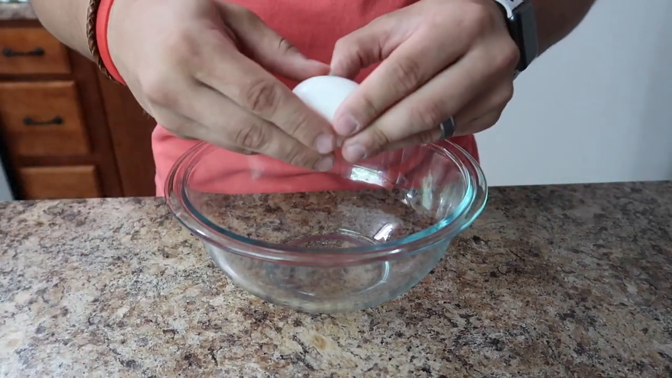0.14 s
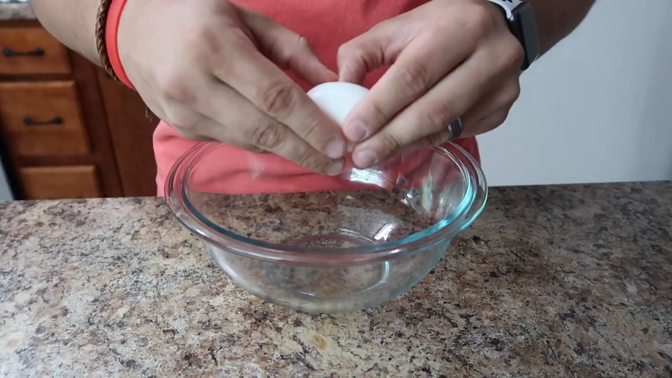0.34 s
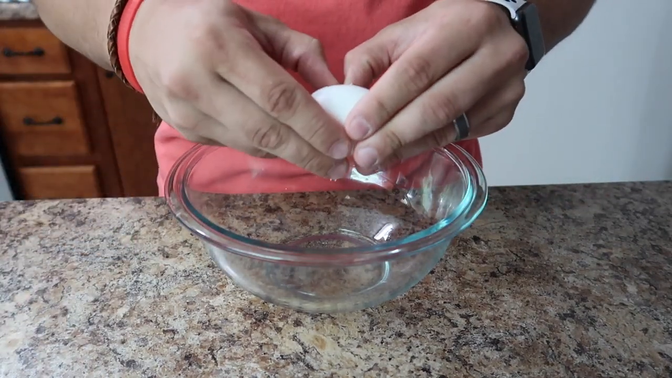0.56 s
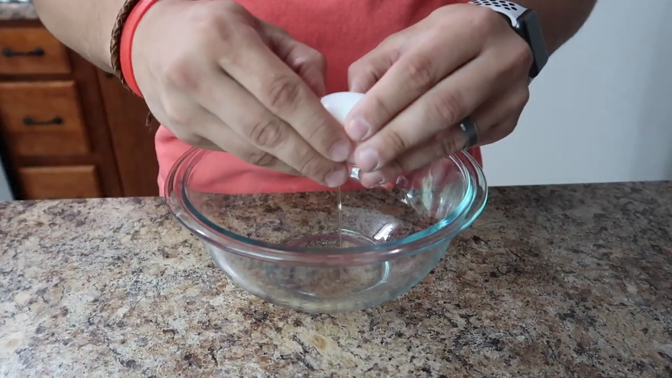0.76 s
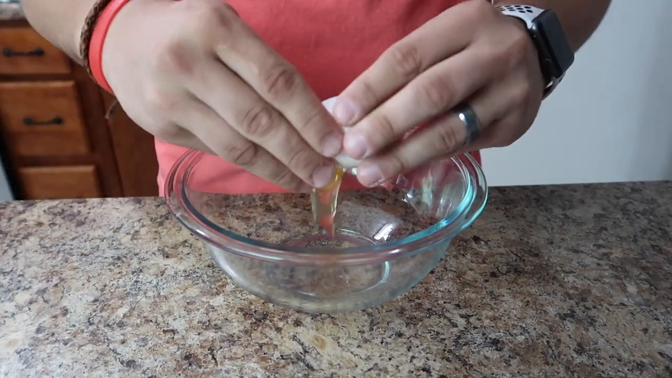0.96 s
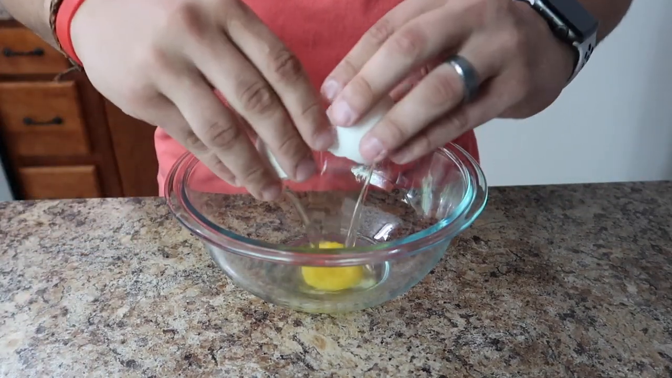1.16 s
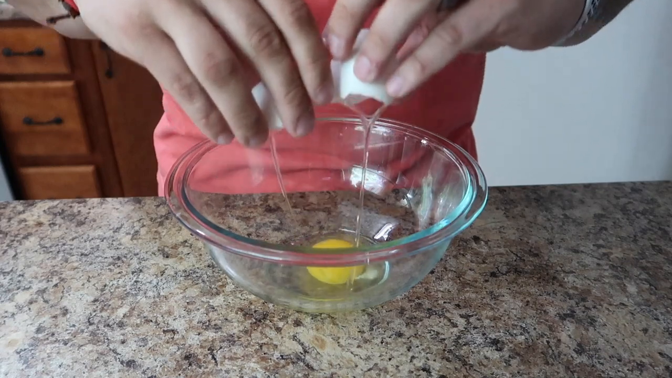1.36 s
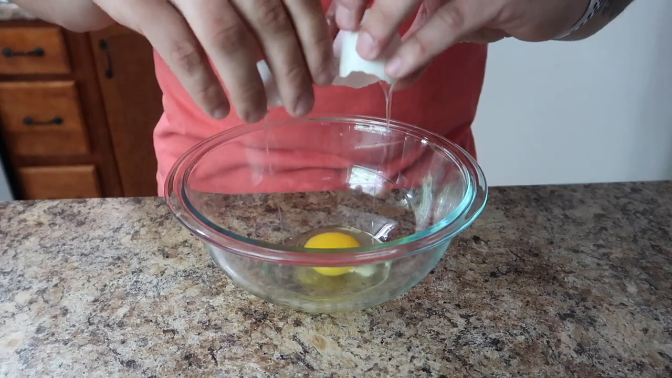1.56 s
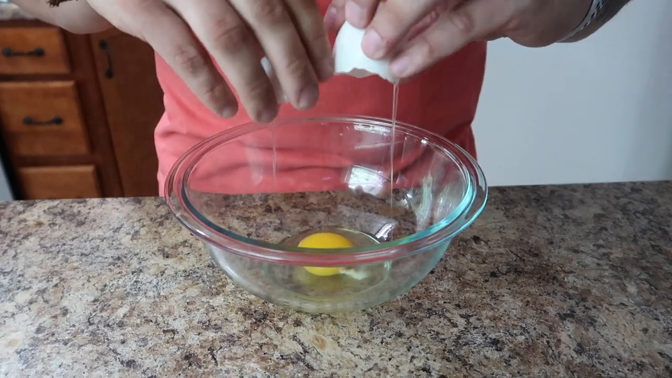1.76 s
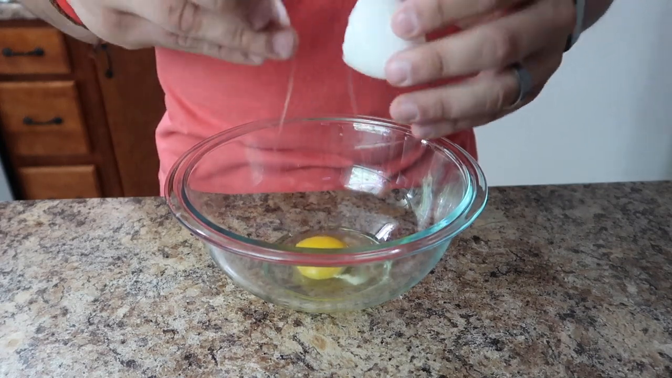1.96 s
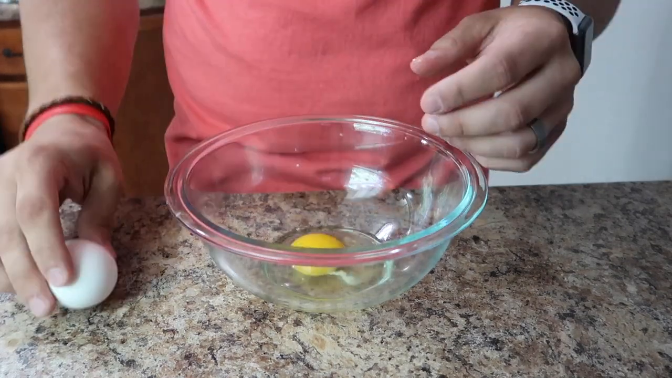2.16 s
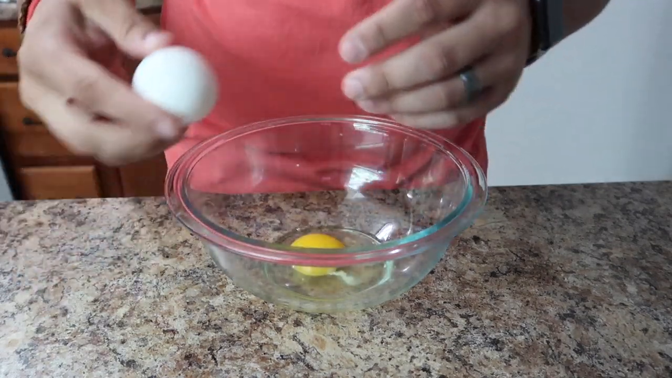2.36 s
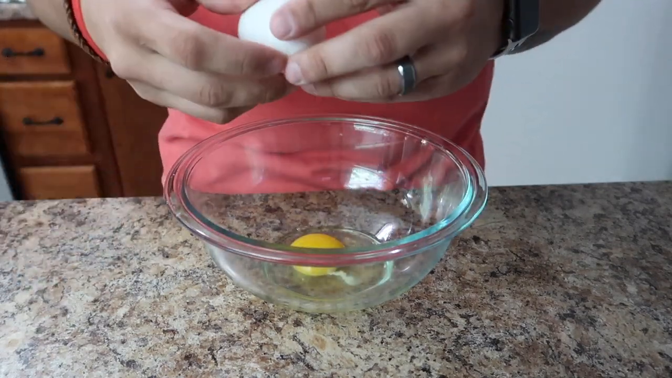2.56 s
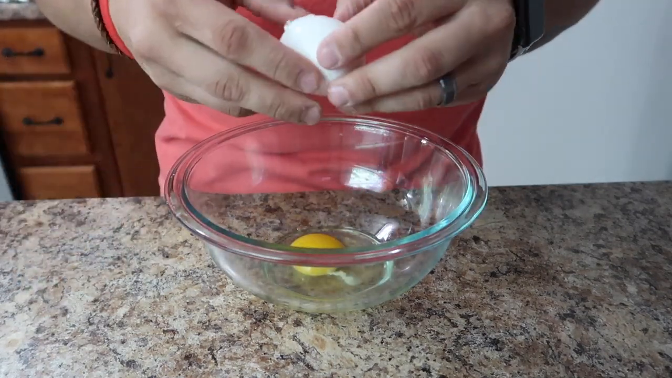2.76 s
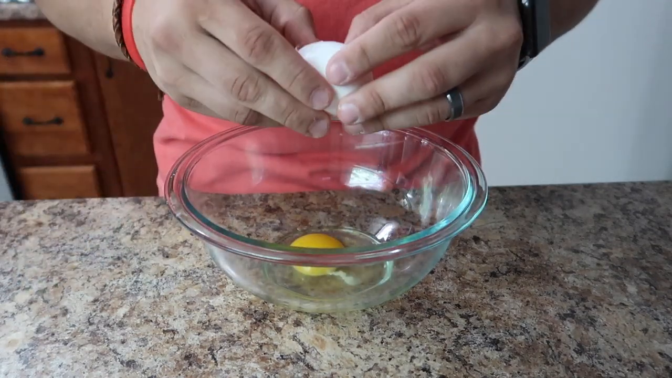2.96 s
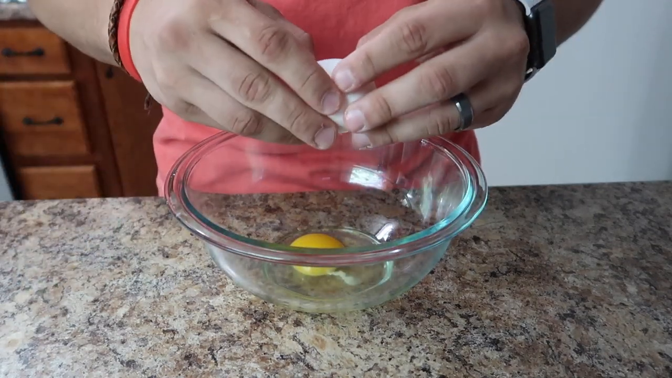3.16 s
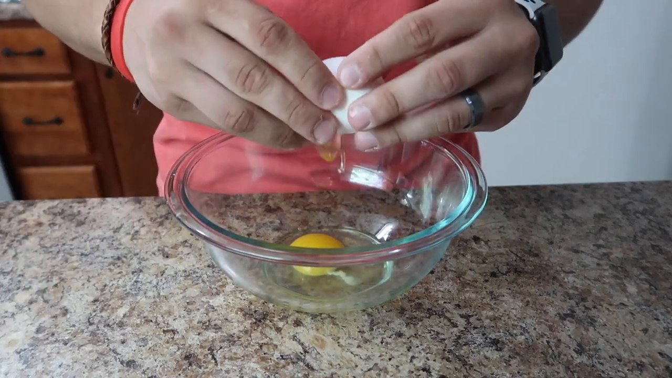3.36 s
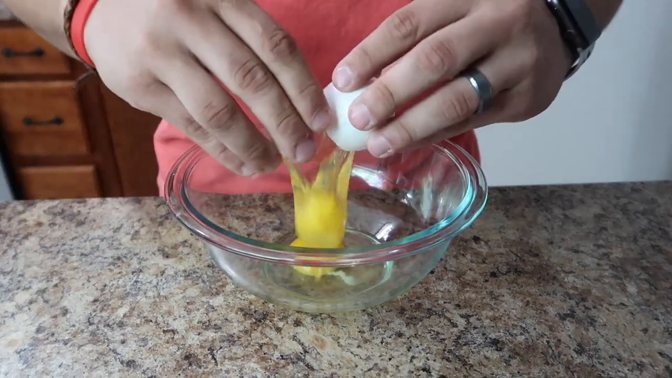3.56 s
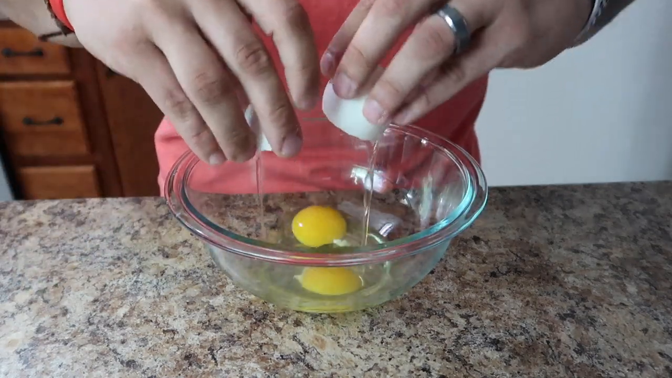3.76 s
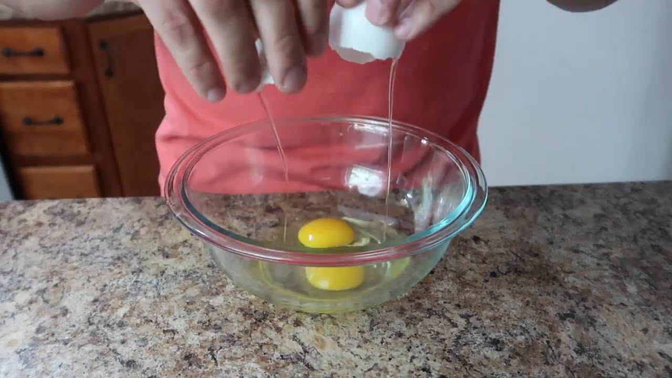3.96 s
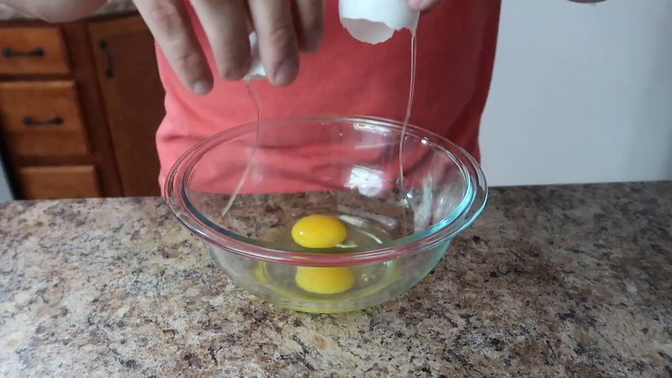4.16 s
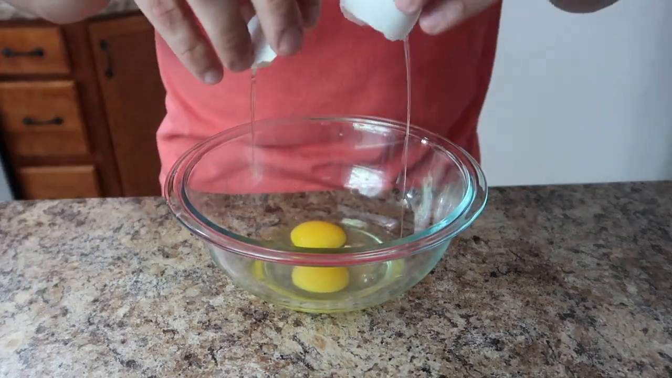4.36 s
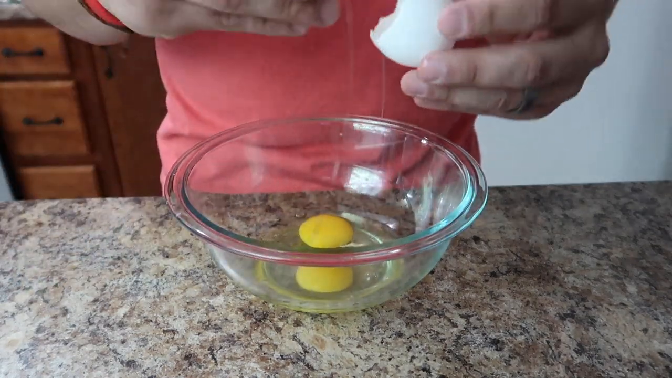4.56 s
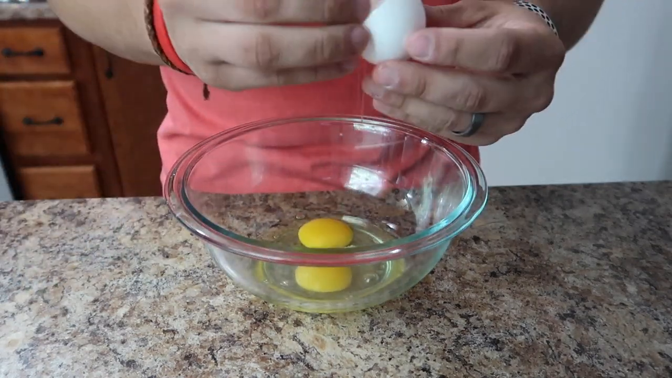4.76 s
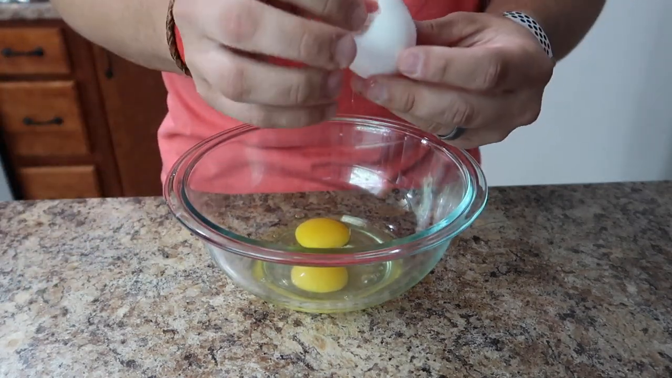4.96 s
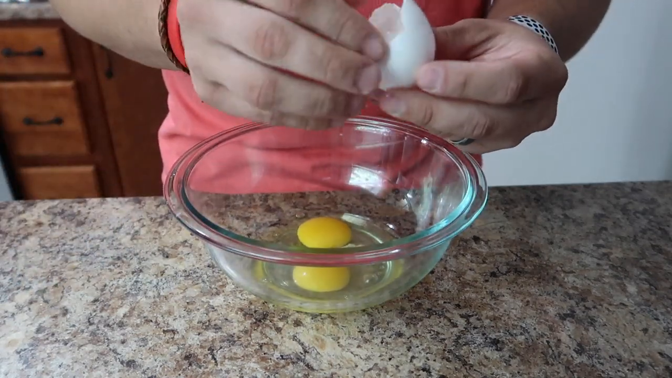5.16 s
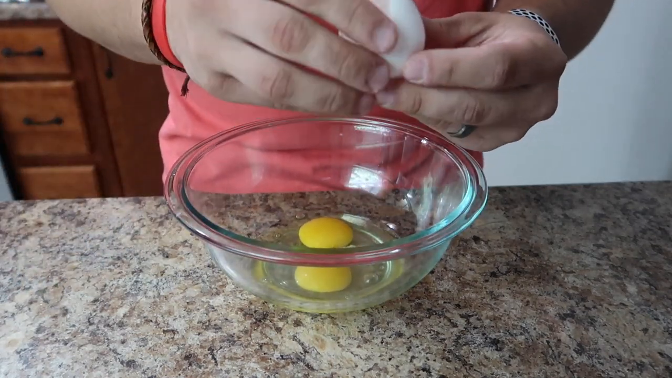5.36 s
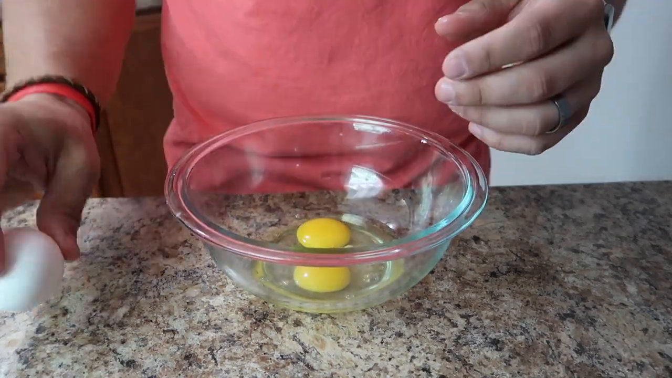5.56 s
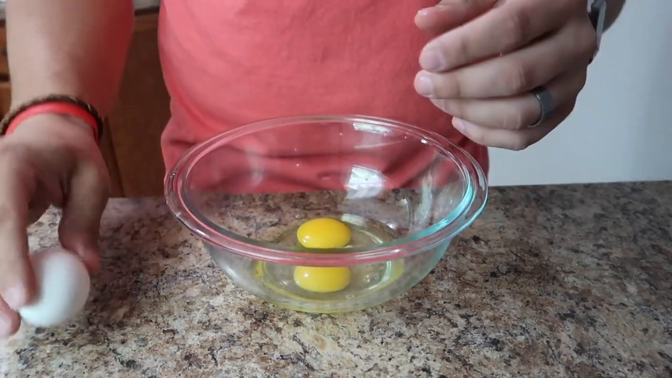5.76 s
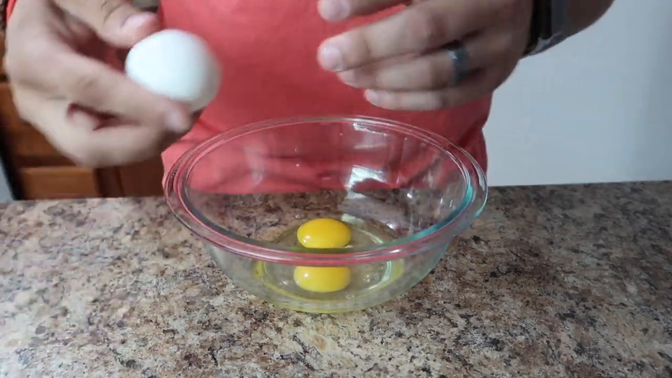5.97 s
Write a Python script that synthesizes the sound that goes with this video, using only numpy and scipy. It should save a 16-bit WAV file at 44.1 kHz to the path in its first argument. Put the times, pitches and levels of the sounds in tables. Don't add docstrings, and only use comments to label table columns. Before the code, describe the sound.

Close up in a kitchen, thumbs prise an eggshell with tiny ticks, then it opens in wet hollow pops and the yolk lands softly. A second egg is knocked hard on the stone counter, crackled open and dropped. Empty halves pop and scrape together loudly, then another sharp knock. A low beating hum runs beneath, thinning when the compressor stops midway. Phone microphone, slightly overloaded on the knocks.

```python
import sys
import numpy as np
from scipy import signal
from scipy.fft import rfft, irfft
from scipy.io import wavfile
from scipy.ndimage import uniform_filter1d, map_coordinates

SR = 44100
rng = np.random.default_rng(int(sys.argv[2]) if len(sys.argv) > 2 else 0)


def makeup_ratio(level_db):
    decades = np.asarray(level_db, float) / 20
    return 10 ** decades


def transcribe(signal):
    frames = np.atleast_2d(signal).T
    limited = np.clip(frames, -1, 1)
    pcm = np.round(limited * 32767).astype(np.int16)
    wavfile.write(sys.argv[1], SR, pcm)


N = 265393
T = np.arange(N) / SR

# (frequency [Hz], level [dB], t60 [s])
HALF_MODES = [(3310, -13, 0.007), (5023, -18, 0.012)]


def band(x, lo_hz, hi_hz):
    return signal.sosfilt(signal.butter(2, [lo_hz, min(hi_hz, .45 * SR)], "band", fs=SR, output="sos"), x)


def add(bus, s, shapes):
    at = (np.asarray(s) * SR).astype(int)[:, None] + np.arange(shapes.shape[1])
    np.add.at(bus, np.clip(at, 0, N - 1), shapes)


def swell(ms, rise_ms, size=2600, power=1.):
    t = 1000 * np.arange(size) / SR
    decay = np.exp(-(t / np.clip(ms, .3, 20)[:, None]) ** power)
    return (1 - np.exp(-t / rise_ms)) * decay


def ring(hz, ms, rise_ms, size=2600, power=1.):
    tone = np.sin(2 * np.pi * hz[:, None] * np.arange(size) / SR)
    return swell(ms, rise_ms, size=size, power=power) * tone


def modes(x, table):
    out = 0
    for hz, db, t60 in table:
        pole = np.exp(2j * np.pi * hz / SR - np.log(1000) / (t60 * SR))
        out = out + makeup_ratio(db) * signal.lfilter([1], [1, -pole], x).imag
    return out


def walk(rate):
    hold = int(SR / rate)
    steps = np.repeat(rng.standard_normal(N // hold + 1), hold)
    wander = uniform_filter1d(steps, hold)[:N]
    return wander / wander.std()


def grains(noise):
    g = np.sign(noise) * abs(noise) ** 1.8
    return g / g.std()


def shell(x):
    # (frequency [Hz], level [dB], t60 [s])
    plate_modes = [(2200, -1.5, 0.0087), (2877, -3, 0.0069), (3430, 3.5, 0.0028), (4500, -3.5, 0.0038),
                   (5460, -10, 0.0037), (6190, -17, 0.018), (8100, -15.5, 0.015)]
    return band(modes(x, plate_modes), 990, 8300) / 10 + makeup_ratio(-8) * band(x, 700, 4500)


def ducking():
    # (time [s], depth [dB])
    dips = [
        (2.215, -9),
        (4.805, -3),
        (5.772, -11),
    ]
    deepest_s, rest_db = 0.3, 1
    gain_db = rest_db
    for s, depth_db in dips:
        u = np.clip(T - s, 0, None) / deepest_s
        gain_db = gain_db + depth_db * (u * np.exp(1 - u)) ** 2
    return gain_db


def kitchen():
    # (time [s], level [dB])
    compressor = [
        (0, -39),
        (2.2, -37.5),
        (2.5, -43),
        (3.6, -45.5),
        (3.68, -85),
        (6.02, -78.5),
    ]
    # (multiple of the fan rate, level [dB])
    fan = [
        (1, -44),
    ]
    # (frequency [Hz], level [dB])
    buzz = [(160, -55), (240, -72.5), (320, -56), (479.5, -58.5)]
    # (frequency [Hz], level per Hz [dB])
    air_colour = [(14, -32.5), (24, -17), (60, -11), (100, -11.5), (150, -16), (240, -8.5), (430, -17.5),
                  (520, -22), (1000, -29.5), (1900, -34), (5000, -46), (10000, -52), (12500, -54),
                  (15000, -72.5)]
    compressor_hz, fan_hz, beat_null_s, air_db = 116.05, 118.45, .37, -45

    turn = 2 * np.pi * (T - beat_null_s)
    motor = np.sin(compressor_hz * turn) + makeup_ratio(-12) * np.sin(2 * compressor_hz * turn)
    hum = makeup_ratio(np.interp(T, *np.transpose(compressor))) * motor
    for multiple, db in fan:
        hum = hum - makeup_ratio(db + 1.2 * walk(3)) * np.sin(multiple * fan_hz * turn)
    for hz, db in buzz:
        hum = hum + makeup_ratio(db + 2.2 * walk(5.3)) * np.sin(2 * np.pi * hz * T)

    f = np.fft.rfftfreq(N, 1 / SR) + 1
    hz, db = np.transpose(air_colour)
    colour = makeup_ratio(np.interp(np.log(f), np.log(hz), db))
    apart = np.clip(f / 2600, 0, 1)
    spread = np.array([f ** 0, apart ** 0.84])
    mid, side = irfft(rfft(rng.standard_normal((2, N))) * colour * spread, N)
    air = makeup_ratio(air_db + 0.27 * walk(2.3)) / mid.std() * np.array([mid + side, mid - side])
    return makeup_ratio(ducking()) * (np.sqrt(2) * hum + air)


def cracks():
    # (time [s], peak level [dB], hollow pitch [Hz], ring [ms])
    pops = [
        (.903, -8.5, 1810, 2.7),
        (0.9257, -9, 1602, 4.1),
        (.995, -8, 1360, 5.8),
        (1.0892, -19.5, 1410, 5.2),
        (1.242, -6.5, 1360, 8.1),
        (4.8046, 2.5, 1778, 2.6),
        (4.8387, -10, 1734, 5.3),
        (4.847, -14.5, 1690, 3.6),
        (5.4988, -20.5, 1375, 3.5),
    ]
    # (time [s], level [dB], frequency [Hz], ring [ms])
    twins = [
        (.9035, -23, 2150, 13.4),
        (0.9286, -10, 1775, 3.5),
        (0.997, -10.5, 1423, 2.7),
        (1.18, -34.5, 8400, 5.6),
        (1.244, -20, 1360, 5.3),
        (4.8052, -14.5, 2050, 4.8),
    ]
    # (time [s], peak level [dB], hollow pitch [Hz], edge noise relative level [dB])
    prising = [(.2883, -41, 1390, -14), (.4304, -39, 1430, -10), (.5765, -39, 1650, -35),
               (.6594, -36, 4120, -10.5), (.6804, -30.5, 3560, -14.5), (.7187, -37.5, 2200, -6.5),
               (.7467, -44.5, 2200, -1), (.8086, -32, 1640, -26), (.8285, -26.5, 1700, -24),
               (1.0705, -24.5, 1430, -30), (1.2027, -38.5, 2980, -6.5), (1.491, -40.5, 1740, -8),
               (1.9725, -41, 2934, -1), (2.7402, -41.5, 2200, -14), (2.8161, -36, 1360, -5),
               (2.9173, -41.5, 2090, -15), (3.031, -35, 2110, -8.5), (3.068, -22.5, 1400, -20),
               (3.1003, -24.5, 1453, -12.5), (3.1701, -36.5, 1370, -16), (3.2074, -43, 1390, -11.5),
               (3.353, -31, 1430, -18), (3.4112, -20, 3220, -1.5), (3.5838, -31.5, 1320, -13.5),
               (3.7476, -25.5, 2934, -20), (3.8375, -31.5, 4520, -15.5)]
    nesting = [(4.703, -48, 1430, 1), (4.9087, -15, 1444, -22.5), (4.94, -34, 1490, -7),
               (5.01, -18.5, 1930, -19), (5.0293, -19, 1540, -9.5), (5.057, -9.5, 1450, -19.5),
               (5.0805, -43, 1400, -26), (5.1027, -31.5, 1415, -16), (5.228, -21.5, 1420, -23),
               (5.2441, -41, 1320, -5.5), (5.3178, -39.5, 1430, -26), (5.4525, -24, 1433, -22.5),
               (5.467, -25.5, 1390, -9), (5.4876, -27, 1300, -21.5), (5.557, -21.5, 1360, -23.5)]
    scuffs = [(.0478, -24.5, 1554, -11), (.7691, -35, 1710, -15), (2.7904, -33, 1386, -18),
              (2.8649, -31, 2210, -3.5), (3.598, -32, 1310, -15), (3.6512, -43.5, 1340, -5),
              (4.8544, -13.5, 1730, -13), (4.8764, -14.5, 1793, -14.5), (5.1467, -36, 1410, 0),
              (5.1537, -24.5, 1430, -8.5), (5.1844, -46.5, 1310, 3.5), (5.4451, -31, 1450, -25),
              (5.587, -31.5, 1280, -23)]
    splinters = [(.014, -51, 1380, 6), (.4534, -23.5, 1635, 3.7), (.4732, -41.5, 2180, 10.5),
                 (.5124, -38, 1340, -3.5), (.8396, -33.5, 2140, -1), (1.1463, -45, 1520, -15),
                 (2.6189, -48, 1370, 2.5), (3.1291, -51.5, 1410, 11.5), (3.2879, -41.5, 2140, -5.5),
                 (3.346, -32.5, 1330, -13.5), (3.3786, -47, 1740, 8.5), (3.705, -30, 1320, -9.5),
                 (3.9822, -37.5, 1930, 1), (4.4914, -50.5, 1286, 2.5), (4.6135, -27, 2278, 3.5),
                 (5.2594, -37, 1430, -3)]
    threads = [
        (.646, -39, 5360, -0.5),
        (1.0213, -19, 4600, -11.5),
        (1.1782, -29, 4840, -2.5),
    ]
    # (events, snap level over edge [dB], tick level over edge [dB], ring [ms])
    kinds = [(prising, -.3, -2, 5.86), (nesting, -.6, -3.5, 5.16), (scuffs, .3, -12.5, 6.1),
             (splinters, -8, 0.26, 5), (threads, -18.5, .3, 4.9)]

    rows = []
    for s, db, hz, ms in pops:
        snap_db = -1.5 - 4 * ms
        rows.append((s, db, hz, snap_db, snap_db - 8.5, ms))
    for events, snap_db, tick_db, ms in kinds:
        rows += [(s, db, hz, edge_db + snap_db, edge_db + tick_db, ms) for s, db, hz, edge_db in events]
    s, db, hz, snap_db, tick_db, ms = np.transpose(rows)
    is_pop = np.arange(len(s)) < len(pops)
    hollow, snap, tick = np.zeros((3, N))
    noise = rng.standard_normal((len(s), 3, 2600))

    rough = np.clip((snap_db + 30) / 16 + .65 * (hz > 2500), 0, 1)
    rough = (rough * np.clip((-4 - db) / 12, 0, 1))[:, None]
    place = np.broadcast_arrays(np.arange(len(s))[:, None], .45 * hz[:, None] * np.arange(2600) / SR)
    flutter = 1 - rough + rough * map_coordinates(.6 + noise[:, 2], place, order=1)

    ring_ms = np.where(is_pop, 1.45, .9) * ms
    rise_ms = np.clip(0.28 * ms, 0, 2.2)[:, None]
    power = np.where(is_pop, 1.6, 1)[:, None]
    add(hollow, s, makeup_ratio(db + 0.5)[:, None] * ring(hz, ring_ms, rise_ms, power=power) * flutter)
    add(snap, s, makeup_ratio(db + snap_db + 1.0)[:, None] * swell(1.83 * ms, 1.1) * grains(noise[:, 0]))
    add(tick, s, makeup_ratio(db + tick_db - 0.5)[:, None] * swell(0.85 * ms, 1.1) * grains(noise[:, 1]))
    s, db, hz, ms = np.transpose(twins)
    add(hollow, s, makeup_ratio(db)[:, None] * ring(hz, ms, 0.6))

    empty_s = 4.7
    halves = makeup_ratio(-9) * band(modes(snap * (T > empty_s), HALF_MODES), 2500, 7000)
    return band(hollow, 1100, 8300) + shell(snap) + halves + band(tick, 3000, 11500)


def rubs(count=45):
    # (loudest time [s], reach [s], hollow level [dB], rasp relative level [dB], hollow pitch [Hz])
    strokes = [(.812, .05, -36, -24, 1783), (.67, .04, -51.5, -14, 3900), (.865, 0.062, -43, -18.5, 1970),
               (4.792, 0.047, -58.5, 7, 1800), (.95, .06, -39.5, -11, 1580), (1.05, 0.3, -49.5, -9, 1390),
               (3.06, 0.11, -54.5, -9, 1464), (3.43, 0.16, -48.5, -5.5, 1770),
               (4.862, .065, -32, -10, 1827), (4.985, 0.056, -39, -14.5, 1830),
               (5.045, .07, -24, -14.5, 1530), (5.184, .07, -57, 2, 1580), (5.6, 0.29, -54.5, -15.5, 1440)]
    fade_db, sag = -18, 0.11
    other_half_hz, ring_ms = 2150, 5
    hollow, rasp = np.zeros((2, N))
    for s, reach, db, rasp_db, hz in strokes:
        when, strength, detune, half = rng.random((count, 4)).T
        off = 2 * when - 1
        at = s + reach * off
        crowd = np.sqrt(count / (2 * reach) / 400)
        spread_db = -4.1 * np.log(strength + 0.026) - 3.5
        gain = makeup_ratio(db + fade_db * abs(off) + spread_db) / crowd
        pitch = np.where(half < .2, other_half_hz, hz * (1 - sag * off))
        pitch = pitch * (1 + 0.295 * (detune - .5))
        add(hollow, at, gain[:, None] * ring(pitch, np.full(count, ring_ms), 0.73, size=900))
        grit = swell(np.full(count, 1.6), .3, size=700) * rng.standard_normal((count, 700))
        add(rasp, at, (gain * makeup_ratio(rasp_db))[:, None] * grit)
    halves = band(modes(rasp, HALF_MODES), 2500, 7000)
    return hollow + makeup_ratio(9.5) * shell(rasp) + halves + makeup_ratio(2.5) * band(rasp, 6500, 13000)


def plops():
    # (time [s], level [dB], frequency [Hz], ring [ms])
    landings = [
        (1.18, -25, 56.4, 25),
        (3.7, -32, 69, 25),
    ]
    out = np.zeros(N)
    s, db, hz, ms = np.transpose(landings)
    add(out, s, makeup_ratio(db)[:, None] * ring(hz, ms, 1.2, size=4000))
    return out


def knocks():
    # (time [s], crunch level [dB], crunch pitch [Hz], split relative level [dB], thud level [dB])
    blows = [
        (2.2147, 4, 1446, -1.5, -0.5),
        (5.7724, 6.5, 2046, -5.5, -2),
    ]
    # (frequency [Hz], level [dB], t60 [s])
    counter_modes = [(45, -37.5, 0.34), (135.4, -12, 0.19), (288, 10.5, 0.014), (353, -6.5, 0.071),
                     (470, -10.5, 0.034), (580, 1.5, 0.016), (673, -45, 0.94), (690, -5.5, 0.01),
                     (1150, -14, 0.027)]
    s, crunch_db, hz, split_db, thud_db = np.transpose(blows)
    crunch, push = np.zeros((2, N))
    lead_ms = 6
    t = 1000 * np.arange(2600) / SR - lead_ms
    lead_in = makeup_ratio(-22) * np.exp(t / 6)
    crush = np.where(t < 0, lead_in, np.exp(-(t / 4.72) ** 2) + 0.17 * np.exp(-t / 14))
    split = np.where(t < 0, lead_in, np.exp(-t / 2.6) + 0.025 * np.exp(-t / 14))
    for k, noise in enumerate(rng.standard_normal((len(s), 2600))):
        middle = band(band(noise, 0.5 * hz[k], 1.59 * hz[k]), 0.26 * hz[k], 1.52 * hz[k])
        body = 1.74 * crush * middle + makeup_ratio(split_db[k]) * split * band(noise, 1800, 9300)
        add(crunch, s[k:k + 1] - lead_ms / 1000, makeup_ratio(crunch_db[k]) * body[None])
    blow = makeup_ratio(thud_db)[:, None] * np.hanning(24) / 12
    add(push, s, .6 * blow)
    add(push, s + 5.4 / 1000, -.7 * blow)
    return crunch + modes(push, counter_modes)


def room(x):
    # (octave centre [Hz], t60 [s])
    octave_t60 = [(250, 0.2), (700, 0.22), (1400, 0.32), (2800, 0.33), (5600, 0.34), (11000, 0.042)]
    t = np.arange(SR // 2) / SR
    noise = rng.standard_normal((3, len(t)))
    tail = 0
    for hz, t60 in octave_t60:
        apart = np.clip(hz / 4000, 0, 1)
        pair = np.sqrt(1 - apart) * noise[0] + np.sqrt(apart) * noise[1:]
        octave = band(band(pair, hz / 2 ** .5, hz * 2 ** .5), hz / 2, hz * 2)
        tail = tail + octave * makeup_ratio(-60 * t / t60)
    tail = tail * (1 - np.exp(-t / .002))
    tail = tail / np.sqrt(np.mean(np.sum(tail ** 2, axis=1)))
    return signal.fftconvolve(x[None], tail, axes=1)[:, :N]


def scene():
    hands = cracks() + rubs() + plops()
    counter = knocks()
    hands_slope = np.gradient(hands - uniform_filter1d(hands, size=9))
    counter_slope = np.gradient(counter - 0.54 * uniform_filter1d(counter, size=21))
    lag = (0.88 + .3 * walk(11)) * hands_slope + 1.1 * counter_slope
    lag = lag + .05 * band(counter, 25, 300)
    near = hands + counter
    cabinets = band(counter, 940, 3300)
    walls = room(makeup_ratio(-15.5) * hands + makeup_ratio(-21.5) * counter + makeup_ratio(-23) * cabinets)
    return np.array([near + lag, near - lag]) + walls + kitchen()


def band_limit(x):
    return signal.sosfilt(signal.butter(12, 15430, fs=SR, output="sos"), x)


def record(dry):
    heard = band(np.clip(dry, -.95, .95), 18, 15500)
    return band_limit(heard)


dry = scene()
out = record(dry)
transcribe(out)
```